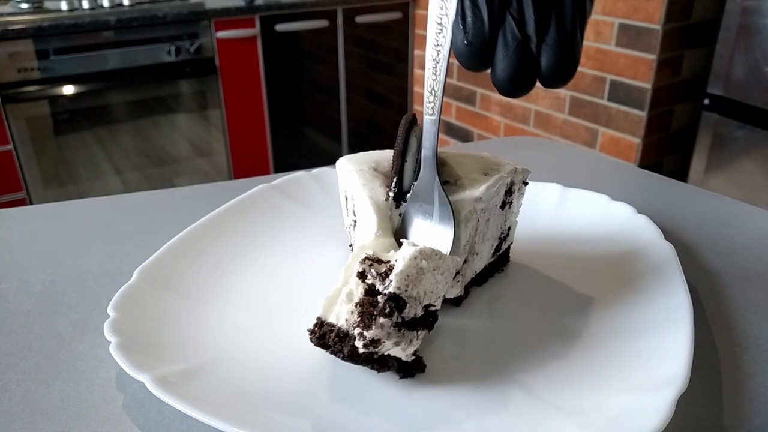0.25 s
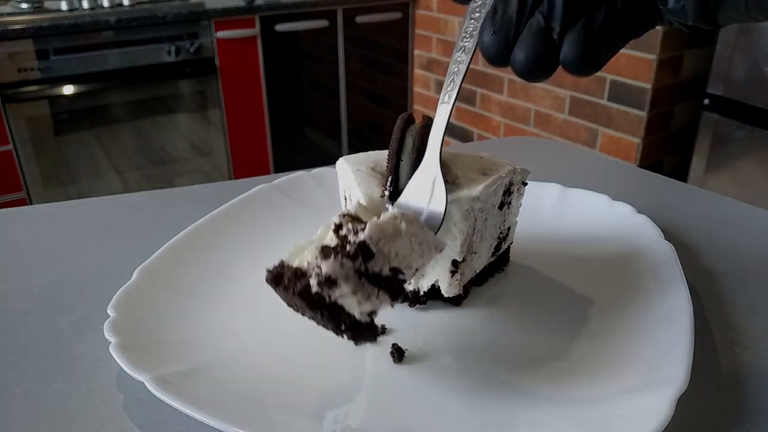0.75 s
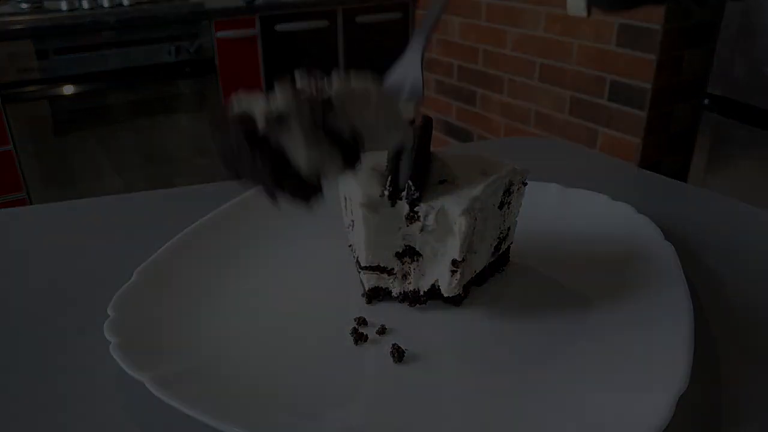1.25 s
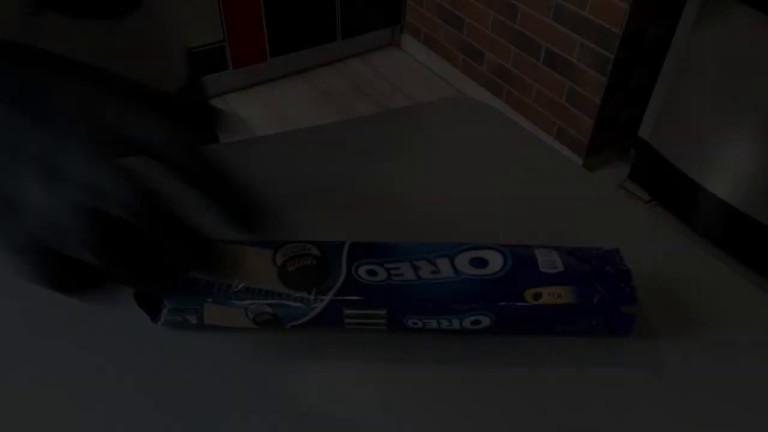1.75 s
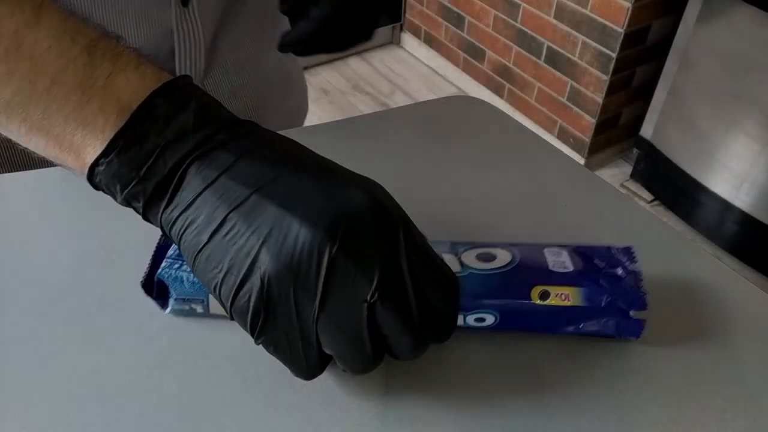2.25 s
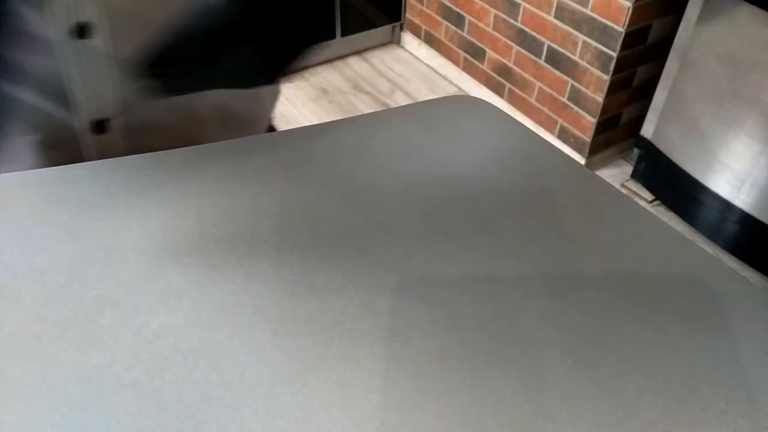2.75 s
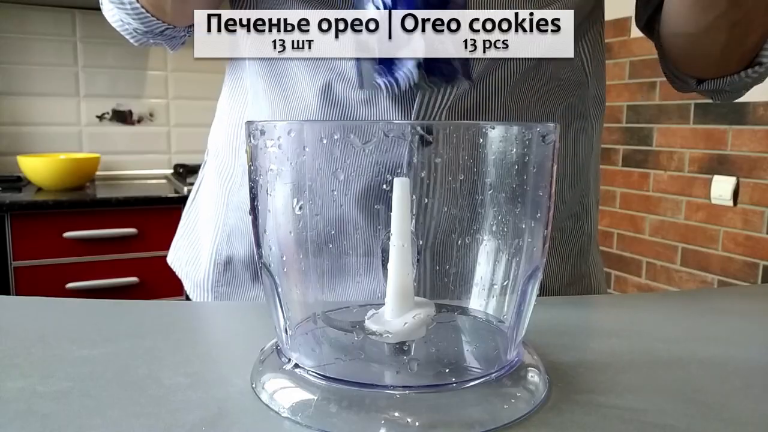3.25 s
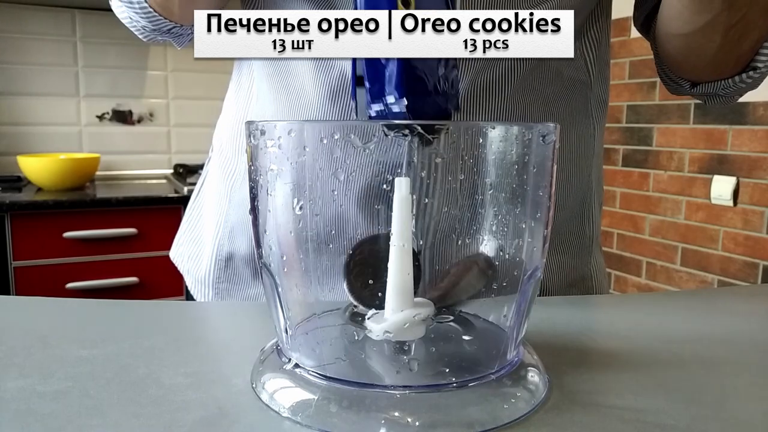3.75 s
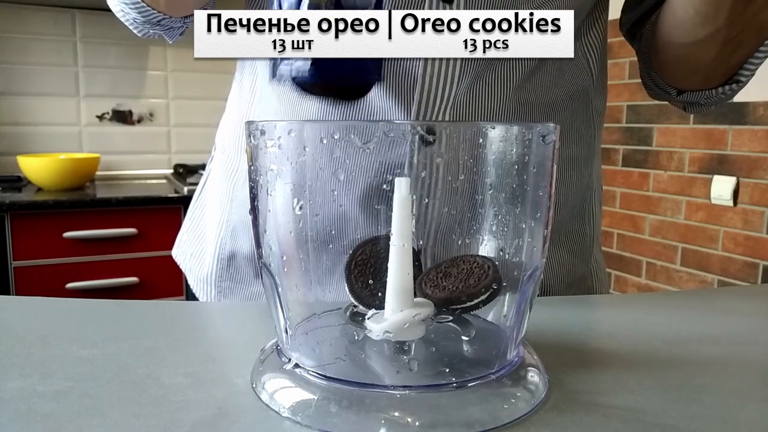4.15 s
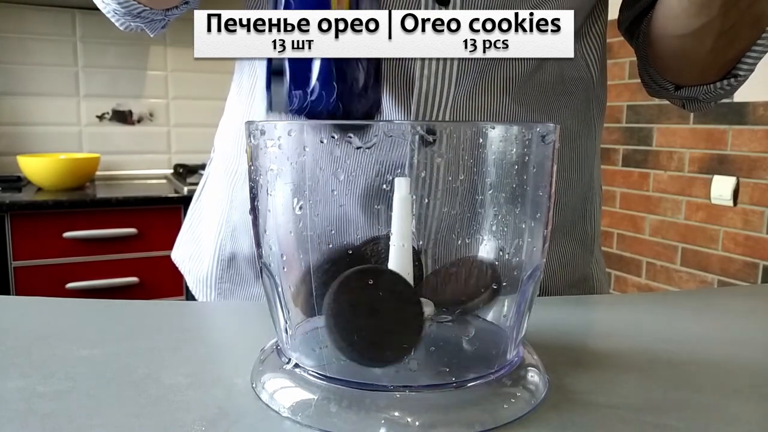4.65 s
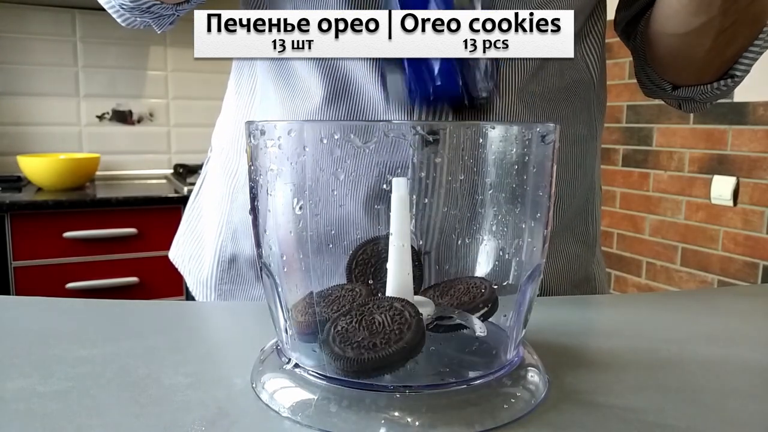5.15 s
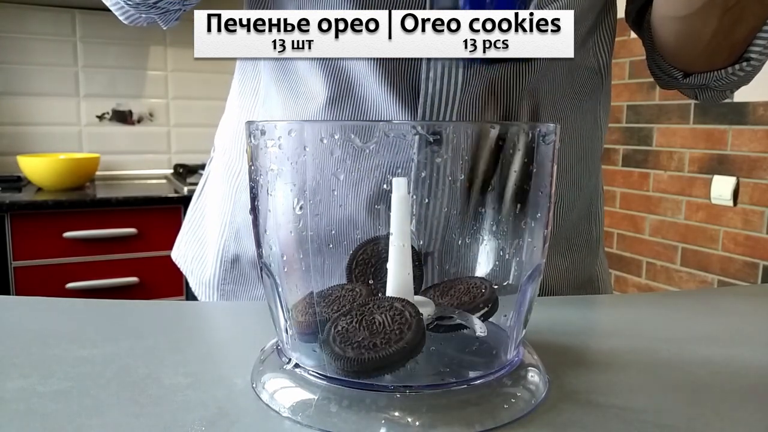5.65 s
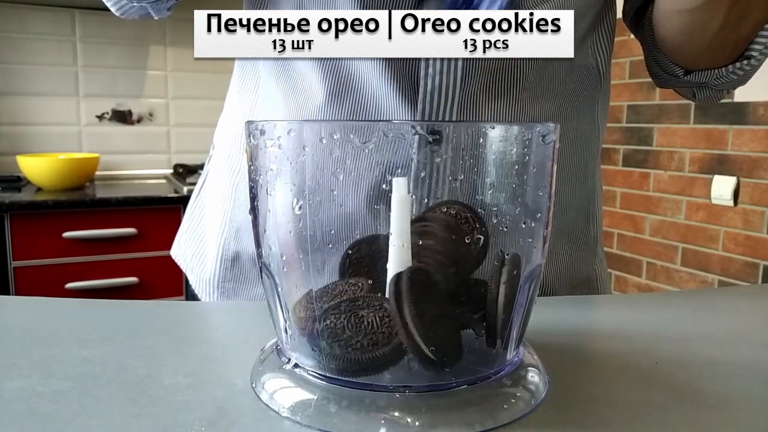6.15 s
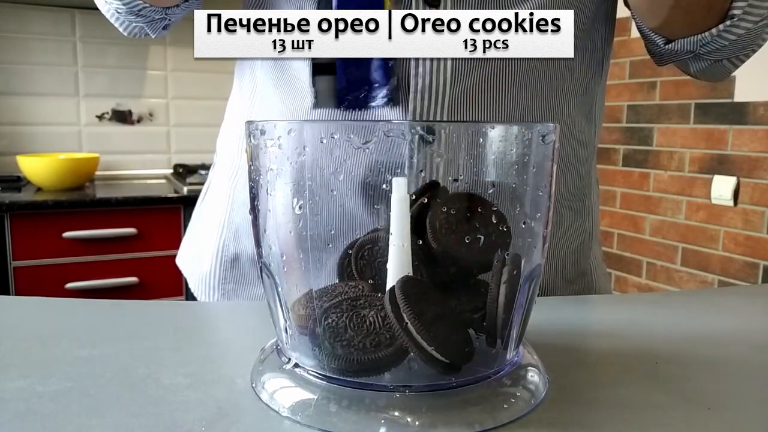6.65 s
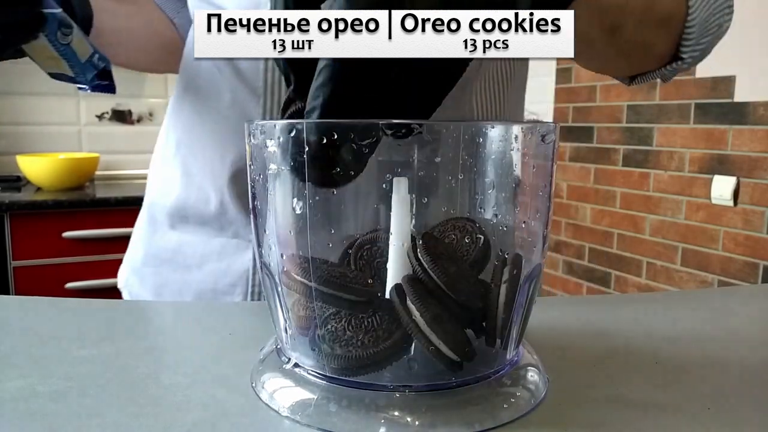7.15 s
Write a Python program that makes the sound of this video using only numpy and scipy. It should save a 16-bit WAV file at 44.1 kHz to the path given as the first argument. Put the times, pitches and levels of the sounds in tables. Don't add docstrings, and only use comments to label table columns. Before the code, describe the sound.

Foil packet crackles and snaps as biscuits tumble in bursts into a hollow plastic bowl, clattering and thumping the table in a quiet tiled kitchen.

```python
import sys
import numpy as np
from scipy import signal
from scipy.io import wavfile
from scipy.ndimage import uniform_filter1d, minimum_filter1d

SR = 44100
rng = np.random.default_rng(int(sys.argv[2]) if len(sys.argv) > 2 else 0)


def pcm_store(signal):
    levels = np.round(np.clip(np.atleast_2d(signal), -1, 1) * 32767)
    wavfile.write(sys.argv[1], SR, levels.astype(np.int16).T)


def rack_gain(trim_db):
    fader = np.asarray(trim_db, float)
    return 10 ** (fader / 20)


N = 327222

# (t/s, snap level/dB, crease f/Hz, pat level/dB, pat f/Hz)
GRIPS = [(2.04, -11, 8100, -25, 1610), (2.082, -12.5, 8700, -26, 1280), (2.0925, -11.5, 9300, -25, 900),
         (2.1322, -13.5, 14500, -25, 1630), (2.2, -25.5, 3000, -28, 1440), (2.255, -24, 3270, -35, 1470),
         (2.5265, -25.5, 8850, -39.5, 880), (2.8382, -30.5, 2450, -37, 1190),
         (3.032, -33.5, 2760, -45.5, 412), (3.181, -7, 10000, -45.5, 795),
         (3.3369, -5.5, 12000, -52.5, 784), (4.095, -38, 4100, -42, 560), (4.1118, -30.5, 2570, -36, 1420),
         (4.233, -31, 2740, -35, 508), (4.248, -16, 10600, -31, 1170), (4.312, -6.5, 8490, -23.5, 1570),
         (4.3637, -7, 8800, -30, 1000), (5.1756, -26.5, 6290, -26, 397), (5.3433, -11.5, 5460, -26.5, 484),
         (6.528, -18, 3140, -23.5, 690), (6.626, -5, 8700, -22.5, 1400)]
# (t/s, peak level/dB, struck f/Hz, edge share/dB, table share/dB)
DROPS = [(1.993, -26, 272, -25, 0), (3.488, -21.5, 420, -17.5, -11), (3.546, -13, 750, 0.5, -7.5),
         (3.619, -8, 730, 3.5, -52), (3.7, -8.5, 720, 2, -12.5), (3.74, -13.5, 739, -2, -32),
         (3.842, -24, 700, -11, -11), (3.915, -27.5, 716, 2, -27), (4.392, -20.5, 346, -5.5, -13),
         (4.448, -15, 670, -20.5, -14), (4.531, -10.5, 734, 4.5, -34), (4.545, -9.5, 710, -25, -28.5),
         (4.565, -10.5, 700, -17, -29.5), (4.617, -11, 740, -2.5, -12), (4.645, -11.5, 690, -2, -8.5),
         (4.694, -9.5, 710, 0.5, -11), (4.718, -22, 644, -12, -8), (4.731, -10, 721, -1, -16),
         (4.774, -18, 725, -7, -14.5), (4.869, -19.5, 780, -11, -18), (4.963, -21.5, 790, -17.5, -16),
         (5.025, -22, 720, -15, -22.5)]
HEAP = [(5.448, -11, 667, -7, -5.5), (5.668, -17, 288, 5, 3), (5.719, -3.8, 572, 2, -16),
        (5.841, -9.5, 675, -10, -11), (5.884, -11.5, 560, 4, -7), (5.764, -16.5, 515, -10, 10),
        (5.801, -10.5, 583, -8, -10), (5.942, -18, 646, -20, -26), (5.966, -6.5, 598, -6.5, -9.5),
        (6.038, -10.5, 577, -2.5, -11), (6.049, -29, 640, -27, -8), (6.074, -11, 730, -6.5, -13),
        (6.085, -9.5, 783, 5.5, -2.5), (6.28, -15.5, 669, -17, -3), (6.34, -10, 245, -16, 5),
        (6.35, -16.5, 329, -17, -15), (6.374, -15, 486, 2, -14), (6.536, -27.5, 585, -22, 12.5),
        (6.569, -18, 696, -16.5, -22), (7.39, -20, 616, -4, -10), (7.402, -15, 680, -3, 0.5)]
BLOWS = DROPS + HEAP
# (f/Hz, level/dB, t60/s)
BOWL = [(485.4, 3.5, 0.067), (609, 7, 0.045), (571.5, -5, 0.14), (710, -14.5, 0.13), (709, 11.5, 0.03),
        (770, -20.5, 0.0072), (880, -21, 0.014), (1100, -12.5, 0.012), (1350, -14.5, 0.01)]
# (f/Hz, level/dB, t60/s)
WALL = [(1240, -12, 0.033), (1692, -11.5, 0.038), (1787, -5, 0.041), (1950, -19, 0.014), (2340, -10, 0.034),
        (2380, -9.5, 0.08), (2475, -7.5, 0.07), (2620, -7, 0.066), (2846, -10.5, 0.054),
        (2970, -11.5, 0.05), (3320, -18.5, 0.041), (3700, -16, 0.025), (4044, -10.5, 0.06),
        (5580, 10.5, 0.0044)]
# (f/Hz, level/dB, t60/s)
TABLE = [(48, -6.5, 0.25), (88.5, -10.5, 0.81), (122, 3, 0.1), (169, 5, 0.044), (247.5, 2.5, 0.12),
         (290, 9.5, 0.083), (354.3, 0, 0.16), (417.8, 7.5, 0.08)]

HARD_DB = -7.5
HUM_END_S = 1.66


def evened(x):
    return x / np.sqrt(np.mean(x ** 2) + 1e-20)


def peaked(x):
    return x / (abs(x).max() + 1e-20)


def read(points, hz):
    f, value = np.transpose(points)
    return np.interp(np.log(hz + 1), np.log(f + 1), value)


def curves(rows):
    s, *columns = np.transpose(rows)
    return [np.interp(np.arange(N) / SR, s, c) for c in columns]


def add(mix, s, sound):
    part = mix[:, round(s * SR):][:, :sound.shape[1]]
    part += sound[:, :part.shape[1]]


def coloured(x, points):
    log_gain = read(points, abs(np.fft.fftfreq(4096, 1 / SR))) * np.log(10) / 20
    taps = np.fft.ifft(np.exp(np.conj(signal.hilbert(log_gain)))).real[:2048]
    return signal.oaconvolve(x, taps[None], axes=1)[:, :x.shape[1]]


def band(x, hz, width):
    r = np.exp(-np.pi * width * hz / SR)
    return signal.lfilter([1, 0, -1], [1, -2 * r * np.cos(2 * np.pi * hz / SR), r * r], x)


def above(x, hz):
    return signal.sosfilt(signal.butter(3, hz, "high", fs=SR, output="sos"), x)


def ring(modes, weights, detune=1, size=9000):
    hz, db, t60 = np.transpose(modes)[:, :, None]
    t = np.arange(size) / SR
    decay = rack_gain(db - 60 * t / np.maximum(t60, .003))
    return weights @ (decay * np.sin(2 * np.pi * hz * detune * t))


def grains(per_s, spread_db, alike):
    size = rack_gain(spread_db * np.minimum(rng.exponential(1, N), 5)) * (rng.random(N) < per_s / SR)
    sign = rng.standard_normal((3, N))
    return evened(size * (alike * sign[0] + sign[1:]))


def patchy(x, depth_db, size, wide, long):
    hz, t, z = signal.stft(x, SR, nperseg=size)
    field = uniform_filter1d(rng.standard_normal(z.shape[1:]), size=wide, axis=0)
    field = evened(uniform_filter1d(field, size=long, axis=1))
    return signal.istft(z * rack_gain(depth_db * field), SR, nperseg=size)[1][:, :N]


def snaps(rows, crunch_t60):
    # (f/Hz, level/dB)
    snap_colour = [(400, 20), (1500, -12), (4000, -5), (9000, 0.5), (13000, -10.5), (15600, -14.5),
                   (16500, -24.5)]
    out, t = np.zeros((2, N)), np.arange(-100, 1600) / SR
    release = np.array([[0, 0, 0, 1, -1], [1, -1, 0, 0, 0]])
    for s, db, hz, crunch_db in rows:
        pan_db = 0.96 + 1.3 * rng.standard_normal()
        strain = rack_gain(-7 + 60 * t / 0.0081)
        crunch = rack_gain(-60 * t / 0.0046) + rack_gain(crunch_db - 3.0 - 60 * t / crunch_t60)
        noise = rng.standard_normal((3, len(t)))
        fizz = (0.5 * noise[0] + noise[1:]) * np.where(t < 0, strain, crunch)
        fizz[:, 100:105] += 7 * release * (hz > 5000)
        broad = np.clip(hz / 4500 - .12, 0, 1.3) * peaked(coloured(fizz, snap_colour))
        pitched = peaked(band(band(fizz, hz, 0.98), hz, 0.98))
        tick = above(broad + 0.2 * pitched, min(hz / 2, 1000))
        pan = rack_gain(np.array([[pan_db / 2], [-pan_db / 2]]))
        add(out, s + t[0] + .001, rack_gain(db + 2.5) * peaked(tick) * pan)
    return out


def creases(rows, hz, crunch_db):
    scatter = 1 + 0.049 * rng.uniform(-0.99, 1, len(rows))
    return [(s, db, hz * u, crunch_db) for (s, db), u in zip(rows, scatter)]


def foil_snaps():
    # (t/s, peak level/dB)
    bends = [(2.0582, -23), (2.1086, -18), (2.1382, -18), (3.234, -8.5), (3.3012, -34.5), (3.316, -31.5),
             (3.442, -33), (3.606, -9), (4.292, -9.5), (4.4023, -16), (4.9977, -18), (5.0457, -16),
             (5.125, -38.5), (5.1637, -16), (5.3178, -5.5), (5.4188, -13.5), (5.4321, -17), (5.583, -11),
             (5.8744, -35), (6.116, 2), (6.2565, -16), (6.3745, 6.5), (7.252, -36.5)]
    # (t/s, peak level/dB)
    catches = [(3.47, -8), (3.5248, -11.5), (4.4199, -18.5), (4.4527, -32), (4.474, -10.5), (4.5479, -3),
               (5.1906, -18), (5.198, -10), (5.3564, -11), (5.4499, -4.5), (5.4997, -7.5), (5.6173, -5),
               (5.641, -3.5), (5.6506, -10.5), (6.2896, -5), (6.3136, 0)]
    # (t/s, peak level/dB, f/Hz)
    clicks = [(3.614, -17.5, 3410), (3.7737, -8, 2520), (3.7829, -9, 4630), (4.745, -23.5, 2360),
              (4.836, -21, 2194), (5.281, -32.5, 2606), (5.4783, -17, 3980), (5.4874, -10.5, 3490),
              (5.6043, -8.5, 4540), (5.663, -2, 6020), (5.833, -9, 2750), (5.876, -8.5, 4300),
              (6.207, -23, 3620),
              (3.7021, -5, 4800), (3.7806, -8, 9630), (4.532, -1, 10100), (4.568, -16.5, 7670),
             (4.62, -8, 4960), (4.6978, -13, 5000), (4.738, -1.5, 10400), (4.748, -19.5, 10900),
             (5.663, -1, 9790), (5.835, -12.5, 6620), (5.883, -20.5, 10920), (5.9726, -5.5, 7940),
             (6.0392, -13.5, 7000), (6.084, -26, 9000), (6.2816, -12, 4380), (3.4424, -24, 4200),
             (2.251, -19, 7300), (2.2772, -24.5, 4900), (5.1773, -26.5, 900), (5.331, -27.5, 1370),
             (6.529, -34, 1090), (3.184, -39, 1390), (3.465, -12.5, 9000), (5.7212, -4, 2150),
             (6.089, -8, 3680), (6.092, -11.5, 1740), (4.699, -12, 1760), (4.741, -11.5, 1750),
             (4.535, -10.5, 2480), (5.838, -20, 2680), (7.405, -14.5, 2900)]
    snap_crunch_db, edge_crunch_db = -8.5, -9
    rows = [(s, db, hz, snap_crunch_db) for s, db, hz, _, _ in GRIPS]
    rows += creases(bends, 10000, snap_crunch_db)
    rows += creases(catches, 8700, 3.5)
    rows += [(s, db, hz, edge_crunch_db) for s, db, hz in clicks]
    for s, db, _, edge_db, _ in BLOWS:
        softness_db = 0.49 * min(db - HARD_DB, 0)
        rows.append((s + 0.0032, db + edge_db + softness_db, 2170, edge_crunch_db))
    return rows


def pats():
    # (t/s, peak level/dB, f/Hz)
    touches = [(.13, -52, 225), (.382, -45.5, 7970), (.55, -47, 770), (.6, -52, 185), (.602, -58, 746),
               (.644, -41, 6860), (.661, -59, 200), (1.227, -45, 5900), (2.45, -45.5, 700),
               (2.839, -45, 324), (3.269, -36, 1180), (3.362, -33.5, 510), (2.0968, -31, 1580)]
    packet = [(s - .001, pat_db, pat_hz) for s, _, _, pat_db, pat_hz in GRIPS]
    return [(s, db, hz, 1.5) for s, db, hz in packet + touches]


def cracks():
    # (t/s, peak level/dB)
    folds = [(2.0403, -32), (2.0818, -32), (2.0935, -25), (2.097, -26), (2.109, -32), (2.1335, -6.5),
             (3.3378, -13), (4.5485, -6), (3.183, -17), (3.2338, -11.5), (4.294, -18.5), (5.1935, -11.5),
             (5.318, -9.5), (5.358, -15), (5.5015, -8), (6.375, -12), (5.605, -14.5), (5.6415, -14),
             (5.9715, -9), (6.0424, -21), (6.627, -7.5)]
    out, t = np.zeros((2, N)), np.arange(-20, 60) / SR
    for s, db in folds:
        tone = np.sin(2 * np.pi * rng.uniform(7000, 17000, (2, 1)) * t)
        pulse = tone * np.exp(-abs(t) / np.where(t < 0, .00006, .00018))
        add(out, s, rack_gain(db) * peaked(pulse))
    return out


def slides():
    # (f/Hz, level/dB)
    rustle = [(300, -54), (1000, -6), (2500, -12.5), (5000, -7.5), (9000, -3), (13000, -11), (16500, -8)]
    # (f/Hz, level/dB)
    muffle = [(9500, 4), (12000, -8.5), (16000, -19)]
    # (start t/s, length/s, rms level/dB, dull share/dB, rise/s)
    strokes = [(1.583, 0.34, -49.5, -24.5, 0.028), (1.883, 9.8, -61.5, -15.5, 0.044),
               (1.983, 0.19, -48.5, -23, 0.059), (2.134, 0.021, -30, -31, .003),
               (2.144, 0.18, -45, -13, 0.033), (2.308, 0.48, -68, -25, 0.24),
               (2.662, 0.32, -55.5, -13, 0.05), (2.95, 0.2, -58, -26.5, 0.28),
               (3.154, 0.044, -39.5, -21, 0.036), (3.273, 0.14, -35, -22.5, 0.071),
               (3.435, 0.038, -31, -22, 0.024), (3.467, 0.092, -21, -16, 0.014),
               (3.602, 0.26, -28.5, -0.5, 0.012), (4.256, 0.37, -40, -22, .04),
               (4.41, 0.057, -20, -21, 0.022), (4.463, 0.036, -26.5, -14.5, 0.0097),
               (4.519, 0.062, -30.5, 3.5, .02), (4.545, 0.25, -30, -9, 0.091),
               (4.714, 0.026, -27, -6, 0.021), (4.994, 0.045, -41, -3.5, 0.037),
               (5.154, 0.057, -35, 0, 0.041), (5.3, 0.075, -31.5, -1.5, 0.049),
               (5.451, 0.077, -26, -13.5, 0.036), (5.576, 0.12, -21, -24.5, 0.053),
               (5.736, 0.076, -22, -12, 0.044), (5.858, 0.15, -30, -17.5, 0.014),
               (6.051, 0.21, -37, 7, 0.034), (6.263, 0.095, -18, -13.5, 0.051),
               (6.36, 0.049, -53, -10, 0.037), (6.325, 0.034, -31.5, -13, 0.029),
               (6.85, 0.38, -85, -33, .04), (7.389, 0.049, -34, -14, 0.034)]
    clumps = rack_gain(1.7 * evened(uniform_filter1d(rng.standard_normal(N), size=250)))
    streaky = patchy(grains(20000, 1.2, 0.39), 2.6, size=512, wide=2, long=8)
    crackle = patchy(streaky * clumps, 2.2, size=256, wide=9, long=9)
    broad = evened(coloured(crackle, rustle))
    soft, thin = coloured(broad, muffle), above(broad, 2000)
    dull = evened(band(band(crackle, 2800, 1.1), 2800, 1.1))
    out = np.zeros((2, N))
    for start, length, db, dull_db, rise in strokes:
        top, end = start + max(rise, .002), start + max(length, 1.9 * rise, .01)
        t = np.arange(start, min(end, N / SR), 1 / SR)
        part = slice(round(start * SR), round(start * SR) + len(t))
        stroke = np.interp(t, [start, top, end], [0, 1, 0]) ** 0.54
        damped = np.clip((dull_db + 14.5) / 10, 0, 1)
        light = np.clip((-dull_db - 22.5) / 8, 0, 1)
        free = light * thin[:, part] + (1 - light) * broad[:, part]
        foil_hz = 8800 * rack_gain(-.25 * np.clip(dull_db + 13.0, 0, 12))
        colour = (1 - damped) * free + damped * soft[:, part]
        colour = colour + 0.47 * evened(band(crackle[:, part], foil_hz, 0.62))
        colour = colour + rack_gain(dull_db) * dull[:, part]
        add(out, start, rack_gain(db) * evened(colour) * stroke[:colour.shape[1]])
    return above(out, 500)


def knocks():
    out = np.zeros((2, N))
    bowl_hz = np.transpose(BOWL)[0]
    in_bowl, in_table = slice(0, len(BOWL)), slice(-len(TABLE), None)
    in_wall = slice(len(BOWL), -len(TABLE))
    push = np.exp(-(np.arange(-40, 40) / (SR * 0.00017)) ** 2)
    heap_damping = rack_gain(-60 * np.arange(9000) / (SR * .05))
    for s, db, hz, edge_db, table_db in BLOWS:
        draw = rng.uniform(-1.34, 1, (4, len(BOWL) + len(WALL) + len(TABLE)))
        detune = 1 + 0.049 * draw[3, :, None]
        spot = draw[0] + 0.95 * draw[1:3]
        near = np.exp(-(np.log(bowl_hz / hz) / 0.17) ** 2) + 0.044
        body = peaked(ring(BOWL, near * (1 + .5 * spot[:, in_bowl]), detune[in_bowl]))
        body += rack_gain(table_db) * peaked(ring(TABLE, 1 + 0.64 * spot[:, in_table]))
        body = signal.oaconvolve(body, push[None], axes=1)[:, 40:9040]
        wall = peaked(ring(WALL, spot[:, in_wall], detune[in_wall] ** 0.17))
        if s >= HEAP[0][0]:
            wall = wall * heap_damping
        swell_s = 0.0057 * np.clip((HARD_DB - db) / 12, .05, 1)
        swell = np.minimum(np.arange(1, 9001) / (SR * swell_s), 1)
        add(out, s + .003, rack_gain(db + 3.5) * (peaked(body) + rack_gain(edge_db - 3) * wall) * swell)
    return out


def aftermath(strengths_db, t60):
    kicks = np.zeros(N)
    np.add.at(kicks, [round(row[0] * SR) for row in BLOWS], rack_gain(2 * strengths_db))
    return signal.lfilter([1], [1, -rack_gain(-120 / (abs(t60) * SR))], kicks)


def motion():
    # (t/s, rumble level/dB)
    hands = [(0, -86), (1.55, -55), (1.63, -51), (1.8, -48), (1.95, -45), (2.08, -39), (2.35, -50.5),
             (2.6, -56), (2.66, -44), (2.8, -46), (2.9, -50), (3.5, -45.5), (4.3, -43), (6.8, -54.5),
             (6.95, -60), (7.05, -54.5), (7.32, -55)]
    # (f/Hz, level/dB)
    rumble = [(15, -21), (35, 1), (60, -2), (85, -3.5), (160, -0.5), (300, -23), (1000, -60)]
    hands_db, = curves(hands)
    _, db, _, _, table_db = np.transpose(BLOWS)
    loose = np.sqrt(rack_gain(2 * (hands_db - 21)) + aftermath(db - 18.5, 0.32))
    shaken = np.sqrt(rack_gain(2 * hands_db) + aftermath(db + table_db - 4.5, 0.66))
    shell = np.concatenate([BOWL, TABLE, WALL])
    share = np.repeat(rack_gain(np.array([0, -5.5, -8])), [len(BOWL), len(TABLE), len(WALL)])
    rattle = signal.oaconvolve(grains(830, 4.46, 1.6), ring(shell, share)[None], axes=1)[:, :N]
    shake = coloured(grains(3700, 1.4, 4), rumble) * rack_gain(np.array([[-1.2], [1.2]]))
    return rack_gain(1.5) * loose * evened(rattle) + rack_gain(-18.0) * shaken * evened(shake)


def rub():
    # (start t/s, length/s, rms level/dB, f/Hz, width as a share of f)
    rim_rub = (7.09, .19, -62, 800, .06)
    start, length, db, hz, width = rim_rub
    stroke = np.interp(np.arange(N) / SR, [start, start + .04, start + length], [0, 1, 0])
    return rack_gain(db) * stroke * evened(band(grains(2800, 0.81, 0.26), hz, width))


def kitchen(x):
    # (f/Hz, t60/s)
    room_decay = [(100, 0.87), (300, 0.86), (700, 0.51), (2000, 0.68), (5000, 0.59), (13000, 0.43)]
    taps = np.zeros((2, SR))
    at = np.arange(200, SR - 20, 20) + rng.integers(0, 20, (2, (SR - 201) // 20))
    np.put_along_axis(taps, at, rng.choice([-1., 1.], at.shape), 1)
    hz, t, z = signal.stft(taps, SR, nperseg=512)
    alike = np.clip(read([(300, 0.65), (1500, 0.21)], hz), 0, 1)[:, None]
    z = z + alike * z[::-1]
    tail = signal.istft(z * rack_gain(-60 * t / read(room_decay, hz)[:, None]), SR, nperseg=512)[1]
    return signal.fftconvolve(x, tail / np.linalg.norm(tail[0]), axes=1)[:, :N]


def turning_kitchen(x):
    turn = np.pi * np.arange(N) / SR * 23
    return sum(kitchen(x * np.sqrt(2 / 3) * np.cos(turn + k * np.pi / 3)) for k in range(3))


def air():
    # (f/Hz, density level/dB per Hz)
    tone_colour = [(20, -7.5), (50, 6), (100, -17), (200, -10), (400, -8), (630, -11), (1000, -17.5),
                   (2000, -18.5), (4000, -16.5), (8500, -13.5), (12500, -19), (16500, -18.5)]
    # (f/Hz, correlation)
    likeness = [(60, -0.61), (180, 0.27), (550, 0.21), (1650, 0.029), (4970, -0.41), (15000, 0.82)]
    # (f/Hz, rms level/dB)
    partials = [(215.3, -82.5), (441.4, -73.5), (629.8, -84)]
    frames, hz = N // 256 + 5, np.fft.rfftfreq(1024, 1 / SR)
    a, b, c, d, patches = rng.standard_normal((frames, 513, 5)).T
    patches = evened(uniform_filter1d(uniform_filter1d(patches, size=10, axis=0), size=16, axis=1))
    same, left = np.clip(read(likeness, hz), -1, 1)[:, None], a + 1j * b
    z = np.array([left, same * left + np.sqrt(1 - same ** 2) * (c + 1j * d)])
    z *= rack_gain(read(tone_colour, hz)[:, None] + 2.0 * patches)
    tone = signal.istft(z, nperseg=1024, noverlap=768)[1][:, :N]
    t = np.arange(N) / SR
    hum = sum(rack_gain(db) * np.sqrt(2) * np.sin(2 * np.pi * f * t) for f, db in partials)
    hum = hum * np.clip((HUM_END_S - t) / 0.072, 0, 1) * rack_gain(np.array([[1.5], [-1.5]]))
    return rack_gain(-62.5) * evened(tone) + hum


def draught():
    t, flutter_hz = np.arange(N) / SR, 36.5
    puffs = band(band(grains(240, 0.96, 3.9), flutter_hz, 1.04), flutter_hz, 1.04)
    return rack_gain(-65) * evened(puffs) * np.clip((HUM_END_S + .25 - t) / .1, 0, 1)


def scene():
    foil = snaps(foil_snaps(), 0.031) + snaps(pats(), 0.059) + cracks()
    bowl, sliding = knocks(), slides()
    near = foil + sliding + motion()
    tails = bowl + turning_kitchen(rack_gain(-7.5) * foil + rack_gain(-4.5) * bowl + rack_gain(-7.0) * sliding)
    tail_level = np.interp(np.arange(N) / SR, [6.81, 6.83, 7.375, 7.38], [1, 0, 0, 1])
    return near + tails * tail_level + air() + draught() + rub()


def band_power(z, bins):
    power = (abs(z) ** 2).mean(0)[:bins].reshape(bins // 4, 4, -1).mean(1)
    return uniform_filter1d(power, size=2, axis=1)


def masked(x):
    hz, t, z = signal.stft(x, SR, "cosine", nperseg=1024, noverlap=512)
    power, band_hz = band_power(z, 512), hz[:512:4, None]
    beside = uniform_filter1d(power, size=11, axis=0)
    around = np.maximum(beside, .45 * uniform_filter1d(beside, size=3, axis=1))
    faint = np.clip((band_hz - 11500) / 4500, 0, 1) ** 2 * rack_gain(2 * -33) * power.sum(0)
    margin = rack_gain(-5 + 2 * (band_hz > 10500) - 3.5 * (band_hz < 4700))
    audible = power > np.maximum(around * margin, faint)
    keep = np.repeat(audible, 4, axis=0) | (hz[:512, None] < 2600)
    z[:, :512] *= np.where(keep, 1, .03)
    return signal.istft(z, SR, "cosine", nperseg=1024, noverlap=512)[1][:, :N]


def shadowed(x):
    hz, t, z = signal.stft(x, SR, "cosine", nperseg=256, noverlap=128)
    power = band_power(z, 128)
    beside = uniform_filter1d(power, size=7, axis=0)
    loudest = -minimum_filter1d(-beside, size=17, axis=1, origin=5)
    weak = (power < loudest * rack_gain(2 * -19)) & (power < .8 * beside)
    emptied = np.repeat(weak, 4, axis=0) & (hz[:128, None] > 2600)
    z[:, :128] *= np.where(emptied, .05, 1)
    top = power[17:23].mean(0)
    snapping = top > 4 * uniform_filter1d(top, size=17)
    z[:, hz > 16000] *= np.where(snapping, 1, .03)
    return signal.istft(z, SR, "cosine", nperseg=256, noverlap=128)[1][:, :N]


def band_limit(x):
    return signal.sosfilt(signal.butter(12, 16990, fs=SR, output="sos"), x)


def record(dry):
    # (f/Hz, level/dB)
    microphone = [(15, -14), (32, -8), (50, 0), (15300, 0), (15900, -4), (16800, -6), (17050, -12),
                  (17300, -60)]
    limited = 0.8 * coloured(np.tanh(dry * 1.342), microphone)
    return band_limit(shadowed(masked(limited)))


dry = scene()
out = record(dry)
pcm_store(out)
```